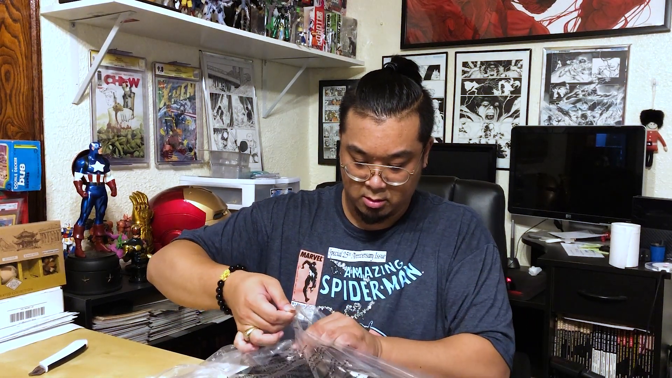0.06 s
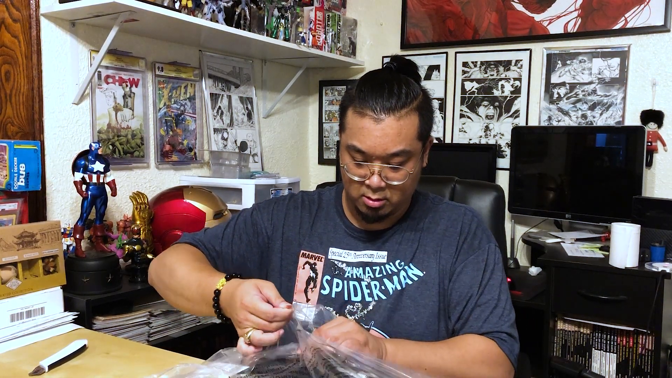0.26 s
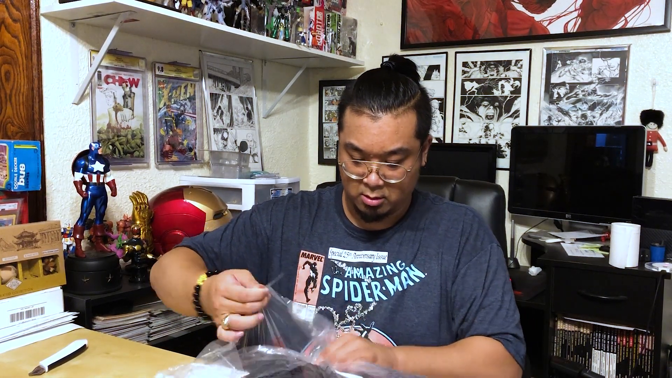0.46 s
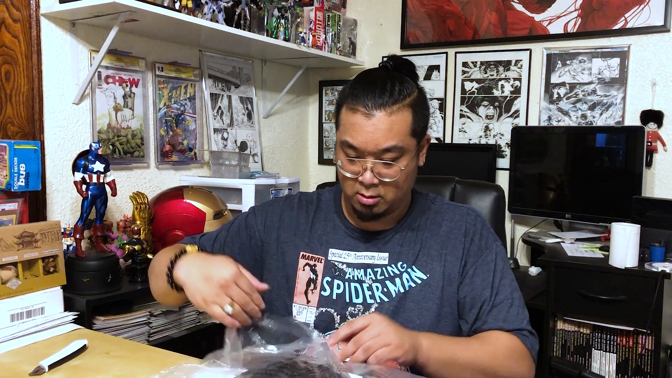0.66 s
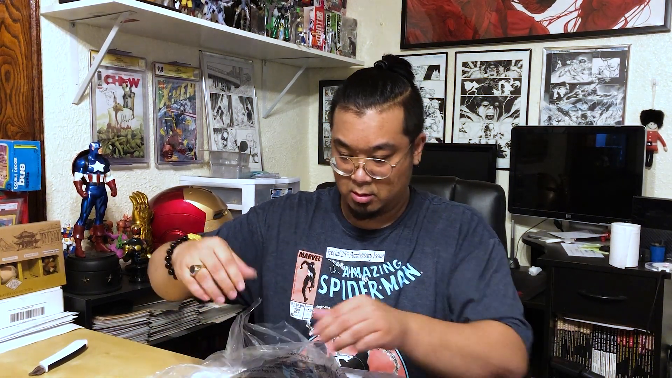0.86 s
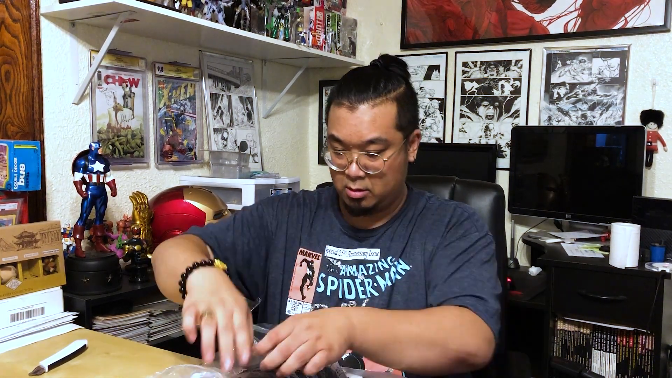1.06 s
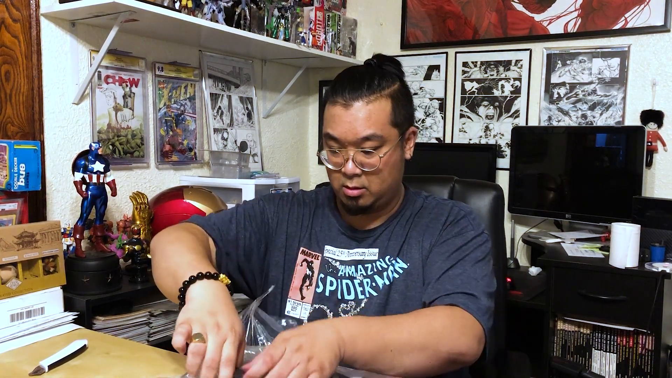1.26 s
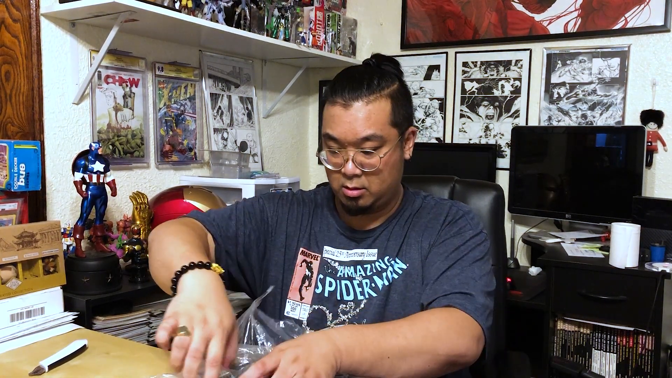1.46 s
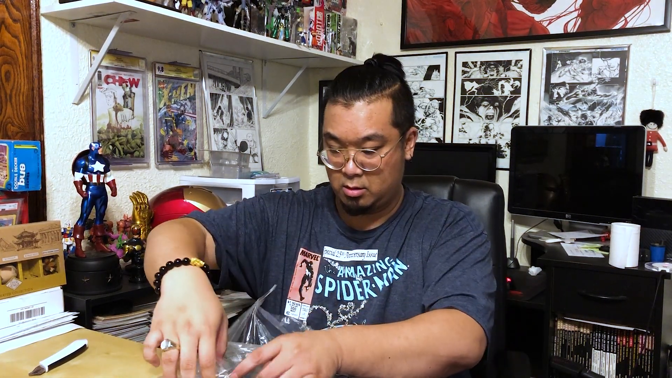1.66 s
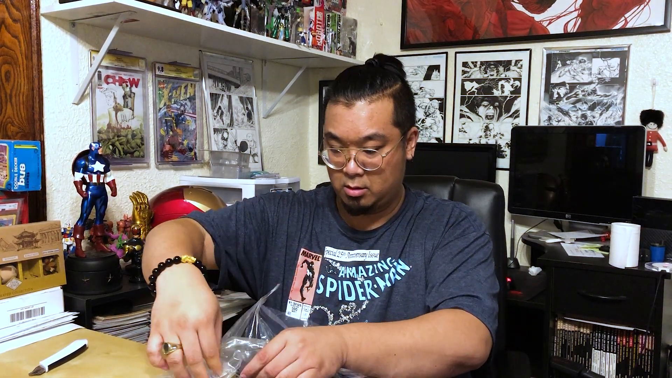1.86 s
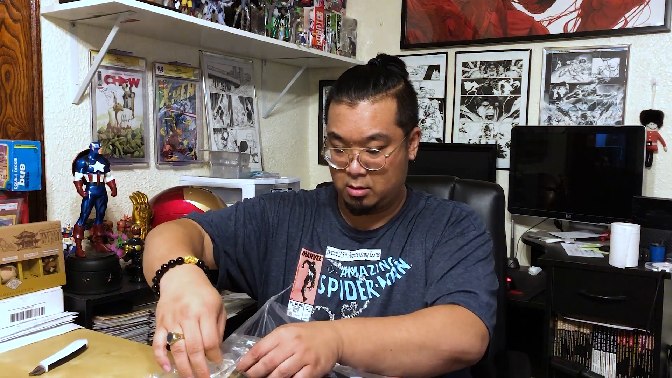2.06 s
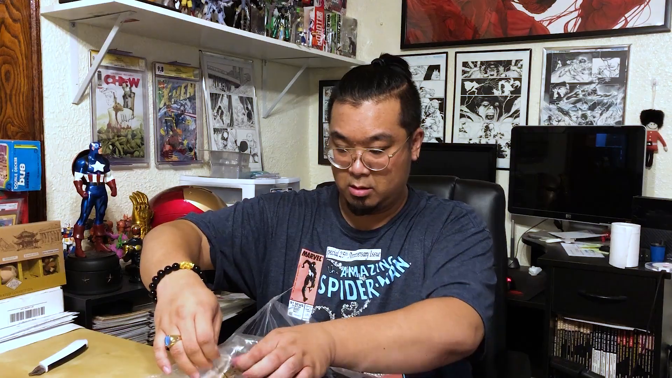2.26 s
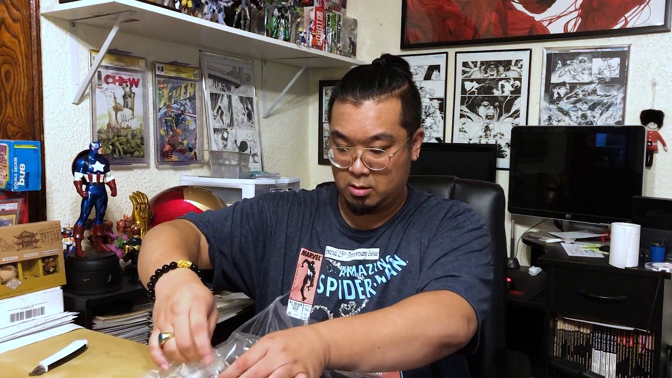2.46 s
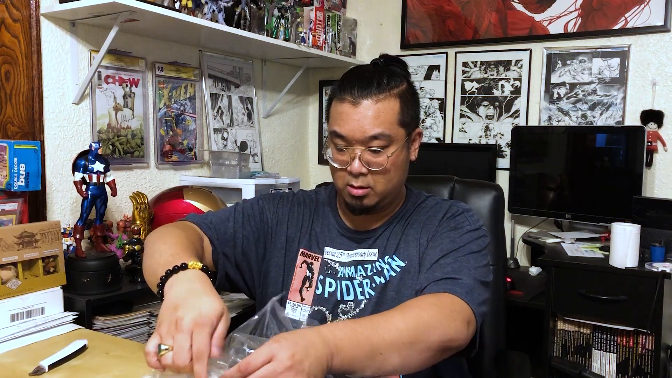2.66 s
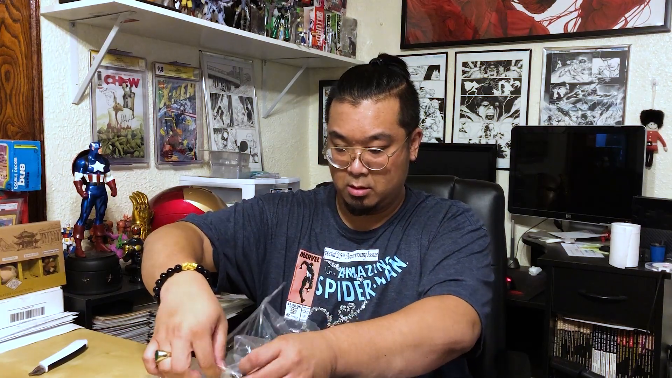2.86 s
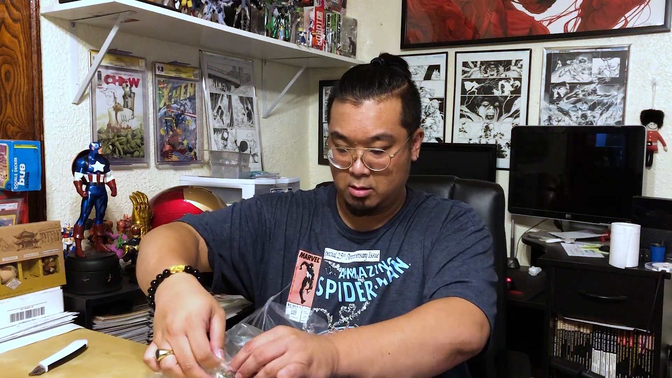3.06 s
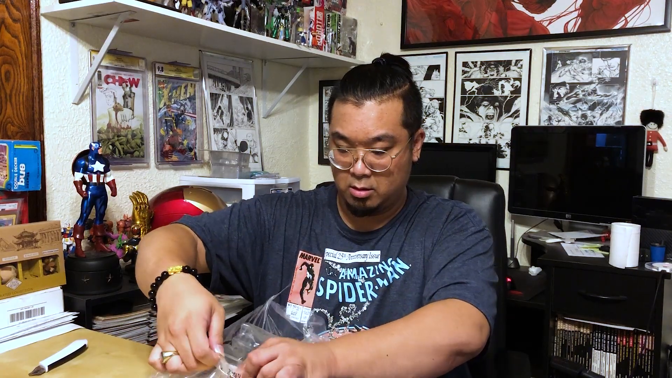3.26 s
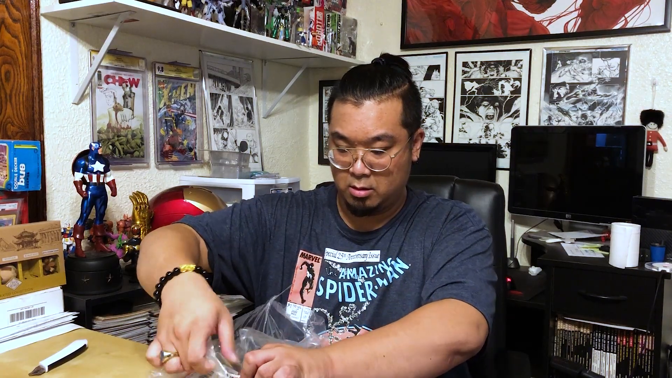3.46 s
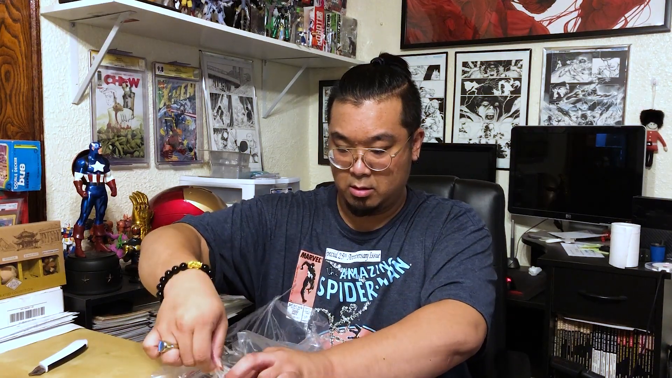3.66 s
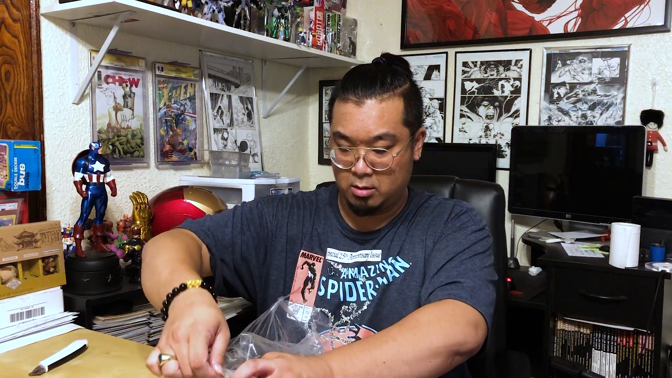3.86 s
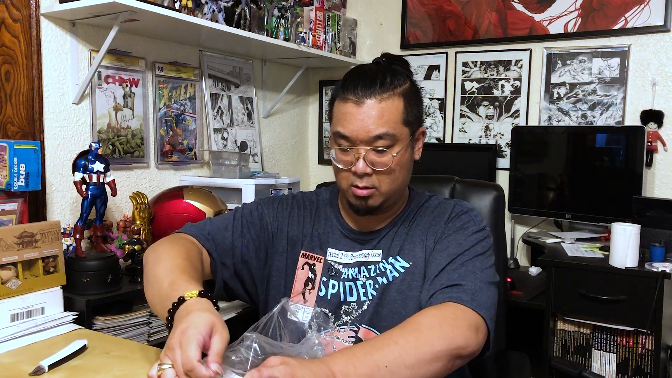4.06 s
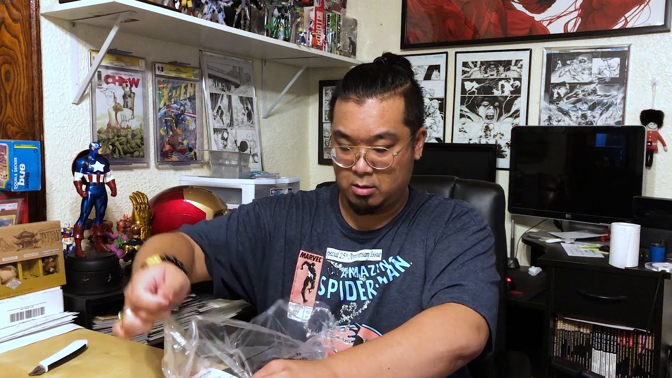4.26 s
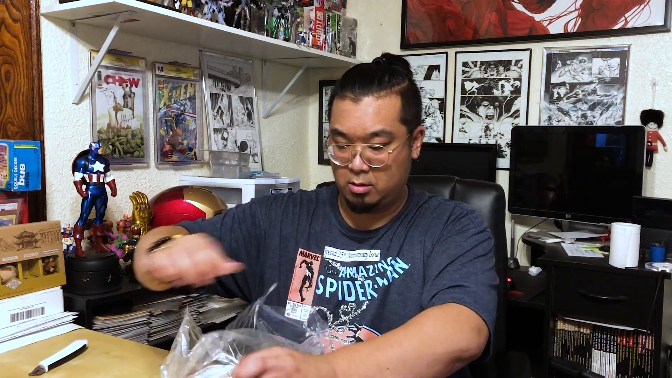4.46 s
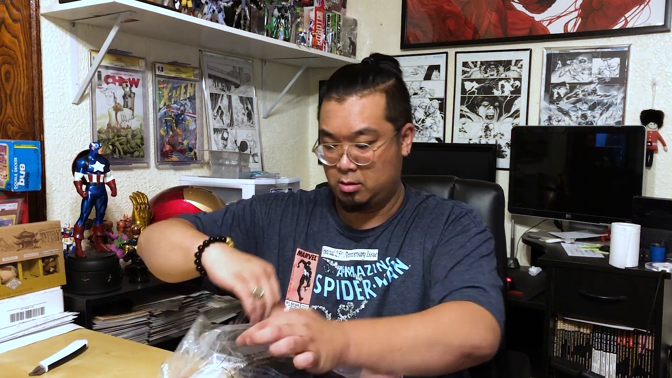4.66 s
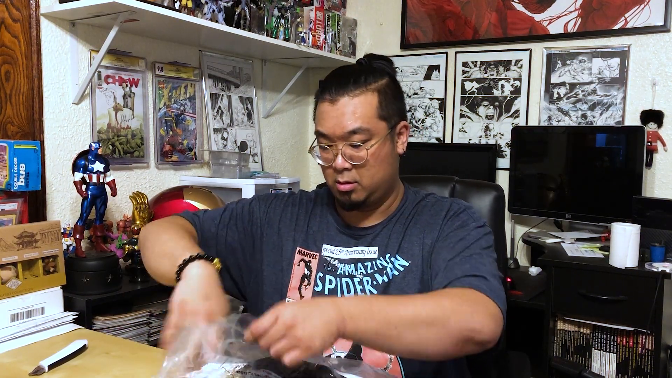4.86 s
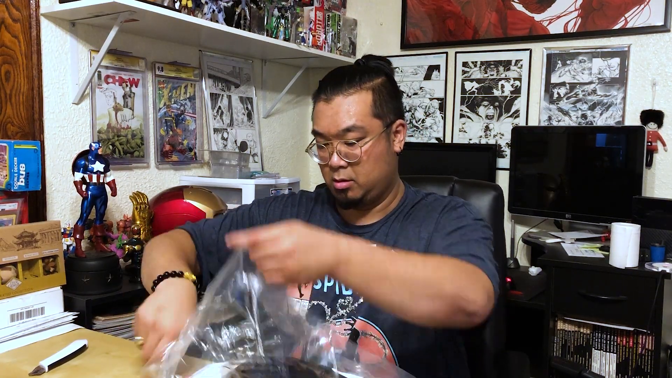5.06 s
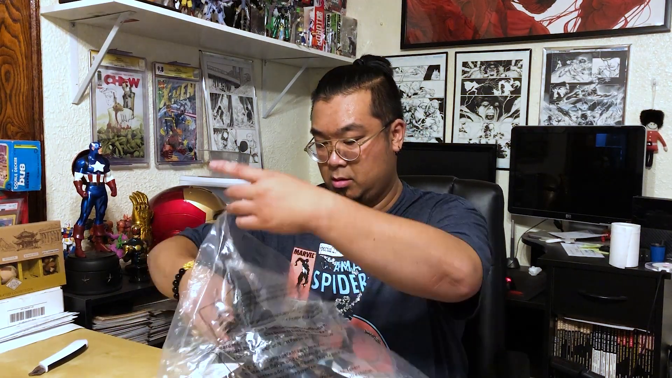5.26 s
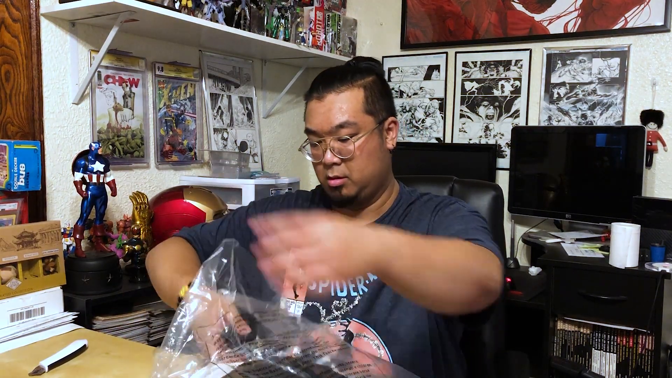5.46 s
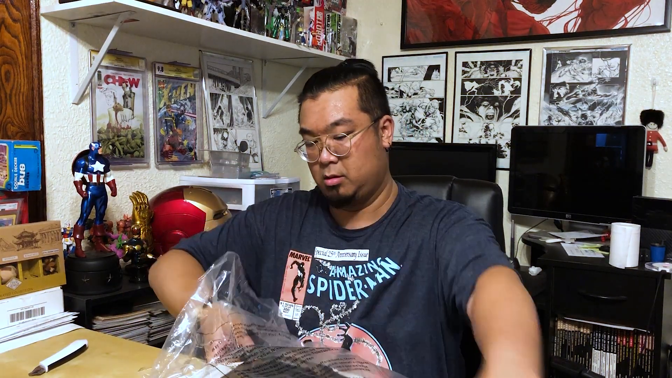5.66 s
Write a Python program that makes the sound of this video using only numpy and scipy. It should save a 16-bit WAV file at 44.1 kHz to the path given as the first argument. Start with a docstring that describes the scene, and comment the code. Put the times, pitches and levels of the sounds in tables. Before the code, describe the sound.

Thin, stiff plastic film is handled close to the microphone in a small room with short reflections. From 0 s it crinkles moderately; at about 0.4-0.5 s a hard tug brings a rush of crackle and a loose sheet whipping with a quick downward thump. Rustling thins and nearly stops around 0.9-1.15 s. From 1.2 s to 4 s the hands fidget steadily: uneven, bright, papery crackle and soft sliding hiss, dotted with tiny sharp snaps, busier near 1.4-1.6, 2.3-2.5 and 3.3-3.7 s. At 4.15-4.3 s a strong tug ends in a hard, sharp pop, the loudest click, with a scatter of crackle after it. Lighter rustle follows, then a fuller, lower crumpling surge at 5.0-5.3 s as the sheet billows. It turns dull and fades by 5.7 s. Still room air and a barely audible, slowly rising low hum lie beneath.

```python
"""Plastic film crackles as hands tug a thin clear wrapper off a new bag at a desk in a small room.
Rustle: clumped facet flips plus sliding hiss; single creases snap as short damped rings.
Early on a bending wave whips the sheet loose with a thump; later the film gives way with a sharp pop.
Panels billow low down, room echoes surround the film, and still air and a faint creeping hum lie underneath."""
import sys
import numpy as np
from scipy import signal
from scipy.fft import rfft, irfft
from scipy.io import wavfile
from scipy.ndimage import uniform_filter1d

SR = 44100
rng = np.random.default_rng(int(sys.argv[2]) if len(sys.argv) > 2 else 0)


def transcribe(u):
    """Save the signal u as a 16-bit wav file named by the first command-line argument.

    u: samples, shape (n,) or (channels, n), limited to [-1, 1]; the rate is SR.
    q: integer samples, one column per channel.
    """
    v = np.clip(np.atleast_2d(u).T, -1, 1)
    q = np.round(v * 32767).astype(np.int16)
    wavfile.write(sys.argv[1], SR, q)


N = 251811
TIME = np.arange(N) / SR  # s

# steady work of the hands on the film: time_s, rustle_db
HAND_EFFORT = [(0.0, -48.5), (0.1, -59.5), (0.31, -52), (0.73, -50.5), (0.93, -74.5), (1.13, -78.5),
               (1.19, -56.5), (1.26, -50), (1.53, -58.5), (1.76, -53.5), (2.04, -57), (2.48, -50.0),
               (2.65, -58), (2.77, -58), (3.24, -52), (3.68, -55.5), (3.77, -60.5), (4.11, -54.5),
               (4.34, -55), (4.92, -53), (5.01, -44.0), (5.22, -46.5), (5.38, -59.5), (5.7, -67.5)]
# sharp tugs, each a short rush of rustle: peak_s, peak_db, fall_s
HAND_TUGS = [(0.395, -40, .03), (0.447, -34, 0.023), (0.478, -40.5, 0.023), (1.425, -50, .038),
             (1.611, -49.5, 0.021), (1.69, -53, .025), (1.884, -55, 0.0278), (2.127, -53.5, 0.0098),
             (2.564, -48.5, .017), (2.7, -53, 0.068), (2.853, -49.5, .04), (3.13, -51.5, 0.022),
             (3.279, -44.5, 0.056), (3.615, -57, 0.12), (3.848, -51, 0.021), (4.108, -51.5, 0.022),
             (4.142, -48, 0.012), (4.198, -40.5, 0.038), (4.265, -38.5, 0.017), (4.623, -50, 0.032),
             (5.505, -55.5, 0.019)]
TUG_RISE_S = 0.016
# drift of the rustle's treble tilt: time_s, tilt_db
TREBLE_TILT = [(0, 0), (1.4, 5), (1.75, 6.5), (2.4, 3.5), (3.1, 6), (4.8, 0.5), (5.25, 3.5), (5.45, -9.5)]
# loudest creases that snap through: start_s, level_db (before a common offset), pitch_hz (centre)
LOUD_CREASES = [(0.1269, -45, 7700), (0.3615, -42.5, 5800), (0.3955, -35.5, 10500), (1.0132, -64, 3620),
                (1.4199, -39.5, 7600), (1.439, -42, 11200), (1.4832, -44, 12400), (1.5478, -35, 7500),
                (1.8868, -41.5, 10100), (1.9386, -45, 5130), (2.209, -47, 8100), (2.242, -42, 6500),
                (2.3566, -42, 8700), (2.3658, -36.5, 8800), (2.4594, -40, 8250), (2.4777, -41.5, 6960),
                (2.676, -41, 7250), (2.8198, -39.5, 5400), (2.8411, -40, 9100), (2.9295, -45.5, 3680),
                (2.9506, -41, 10300), (3.0045, -43, 6000), (3.2564, -36.5, 10200), (3.2853, -43, 5230),
                (3.4487, -36, 7440), (3.5338, -43, 4440), (3.6845, -35.5, 8400), (3.802, -44, 8370),
                (4.1421, -37.5, 5900), (4.1736, -32, 9800), (4.5414, -38, 6780), (4.8259, -42.5, 4470),
                (4.9381, -41, 7000), (5.2119, -34.5, 8300), (5.5926, -48.5, 8310)]
# taut film gives way: start_s, level_db (before a common offset), pitch_hz (centre)
FILM_POPS = [(4.1863, -16.5, 8900), (4.2616, -47, 5170), (4.2655, -42.5, 6100)]
# slack panel flaps: start_s, peak_db, pitch_hz (at the start), travel_s (of the wave)
SHEET_FLAPS = [(0.4368, -23.5, 1350, .008), (0.478, -44, 280, .025), (2.573, -47, 1400, .007),
               (3.337, -43, 1600, .007), (3.45, -47, 1300, .008), (3.685, -50, 700, .008),
               (4.09, -49, 900, .007), (4.824, -55, 350, .015), (5.046, -45, 1500, .006),
               (5.657, -50, 1000, .012), (5.68, -53, 800, .012)]

# relative spectra of the film's sounds: freq_hz, gain_db
CRACKLE_SPECTRUM = [(300, -15), (800, 6.5), (1500, -1), (2800, 2), (5000, -1), (8000, -2), (10500, -4.5),
                    (13000, -5.5), (16000, -11.5)]
SLIDE_SPECTRUM = [(400, -16), (1000, -0.5), (1600, 4.5), (2800, 3), (5000, 1.5), (8000, -6), (10500, -9),
                  (13000, -41), (16000, -33)]
BILLOW_SPECTRUM = [(40, -17.5), (90, -14), (150, 0.5), (250, -3.5), (330, 0), (430, 0), (550, -2),
                   (850, -2.5), (1150, -4.5), (2000, -5), (5000, -49.5)]
SNAP_SPECTRUM = [(150, -6), (700, 7), (1400, 2.5), (3000, 10.5), (6000, 0.5), (10000, -0.5), (13000, 0),
                 (16000, -6)]
POP_SPECTRUM = [(100, -10), (750, -19), (1350, 17), (2050, 7.5), (3200, 3), (5000, 0.5), (7000, -2),
                (10500, -4.5), (13000, 0.5), (16000, 0.5)]
# relative spectrum of the still air: freq_hz, gain_db
AIR_SPECTRUM = [(20, -42), (60, 8), (85, 4), (100, -3.5), (125, 10.5), (175, -1), (260, -0.5), (450, -4),
                (1000, -10.5), (3000, -20), (8000, -25), (16000, -26.5)]

# standing waves of the room: freq_hz, t60_s, level_db (before a common offset)
STANDING_WAVES = [(142, 0.77, -3), (316, 0.13, -5), (527, 0.31, -19), (582, 0.43, -18), (759, 0.092, -9),
                  (910, 0.37, -46)]
# decay of the diffuse tail: freq_hz, t60_s
TAIL_DECAY = [(150, 0.22), (1000, 0.27), (4000, 0.43), (9000, 0.32), (16000, 0.27)]
# hum creeps up: time_s, pitch_hz
HUM_PITCH_CURVE = [(1.0, 27.3), (1.2, 37.9), (1.6, 46), (2.5, 48.6), (3.5, 52.14), (3.9, 64.3),
                   (4.7, 68.94), (5.71, 72.5)]
# bass resonances that lift the hum: freq_hz, width_hz, level_db
BASS_RESONANCES = [(41.5, 7.2, -67), (51, 3.6, -72), (70.5, 3, -65), (83, 7.6, -62), (130.2, 7, -64)]
# hum partials 1, 2, 3: level_db
HUM_PARTIAL_LEVELS = [0, 0, -10]

USUAL_DB = -54  # rustle level of ordinary handling
TILT_PER_DB, DULLEST_DB, BRIGHTEST_DB = 0.45, -13, 5.5  # treble tilt per dB of rustle above usual; limits
BEND_TURNS = 2.425  # wavelengths across a facet at its own pitch
SMALL_PER_S, SMALL_DB, SMALL_SPREAD_DB = 40, 5, 2.5  # chance creases; level against the rustle
SMALL_LOW_HZ, SMALL_HIGH_HZ = 6000, 11500
REBOUND_DB, REBOUND_MIN_S, REBOUND_MAX_S = -9.5, 0.0012, 0.0032  # against and after the first snap
BILLOW_DB, BILLOW_PER_DB = -64.6, 0.8157  # billow at the usual rustle; growth per dB of rustle
SHAKE_DB, POP_SHAKE_DB = -14.5, -31  # billow jolt against the flap's peak, the pop's table level
SHAKE_RISE_S, SHAKE_FALL_S = 0.015, 0.035
PATTERNS_PER_S = 50  # echo patterns
EDGE_HZ = 16250


def amp(db):
    """Decibels to gain."""
    return 10 ** (np.asarray(db) / 20)


def unit(x):
    """Scales to rms 1."""
    return x / np.sqrt(np.mean(x ** 2) + 1e-20)


def read(points, hz):
    """Reads a table on a log-frequency axis."""
    f, value = np.transpose(points)
    return np.interp(np.log(hz + 1), np.log(f + 1), value)


def curves(rows):
    """One value a sample for each column of a time table."""
    s, *columns = np.transpose(rows)
    return [np.interp(TIME, s, c) for c in columns]


def add(mix, s, sound):
    """Mixes a sound in at time s."""
    part = mix[max(0, round(s * SR)):][:len(sound)]
    part += sound[:len(part)]


def burst(s, rise_s, fall_s):
    """Envelope that swells up to time s and dies away after it."""
    return np.exp(np.minimum((TIME - s) / rise_s, (s - TIME) / fall_s))


def colour(x, points, size=4096):
    """Causal filter of unit energy with the given spectrum."""
    hz = abs(np.fft.fftfreq(size, 1 / SR))
    log_gain = np.log(amp(read(points, hz)))
    minimum_phase = np.exp(np.conj(signal.hilbert(log_gain)))
    taps = np.fft.ifft(minimum_phase).real[:size // 2]
    return signal.oaconvolve(x, taps / np.linalg.norm(taps))[:N]


def effort():
    """Rustle level in dB: steady work of the hands plus sharp tugs, summed as power."""
    steady_db, = curves(HAND_EFFORT)
    power = amp(steady_db) ** 2
    for s, db, fall_s in HAND_TUGS:
        power = power + (amp(db) * burst(s, TUG_RISE_S, fall_s)) ** 2
    return 10 * np.log10(power)


def film(rustle_db):
    """Crackle and sliding hiss follow the hands; broad panels of the sheet billow lower down."""
    tilt_db = curves(TREBLE_TILT)[0] + TILT_PER_DB * (rustle_db - USUAL_DB)
    tilt_db = np.clip(tilt_db, DULLEST_DB, BRIGHTEST_DB)
    grains = crackle(rustle_db, per_s=900, spread_db=4, clump_db=4.5, clump_s=0.004, ring_s=0.00017)
    slide = unit(colour(rng.standard_normal(N), SLIDE_SPECTRUM))
    rustle = amp(rustle_db) * (amp(-5.0) * grains + amp(-8.5) * slide)
    # taut film is bright, slack film dull
    body = signal.sosfilt(signal.butter(1, 6500, fs=SR, output="sos"), rustle)
    treble = rustle - body
    rustle = body * amp(-0.4 * tilt_db) + treble * amp(0.95 * tilt_db)
    folds = rng.standard_normal(N) * (rng.random(N) < 1800 / SR)  # 1800 impulses per s
    return rustle + billowing(rustle_db) * unit(colour(folds, BILLOW_SPECTRUM))


def crackle(effort_db, per_s, spread_db, clump_db, clump_s, ring_s, count=24000):
    """Facets of many sizes flip in clumps, more often the harder the film is worked."""
    drift = uniform_filter1d(rng.standard_normal(N), max(2, round(clump_s * SR)))
    clumps = amp(clump_db * unit(drift))
    clumps /= uniform_filter1d(clumps, size=2048)  # clumps share out the stress that the hands supply
    rate = per_s * amp(0.6 * (effort_db - np.median(effort_db)))
    rate = np.minimum(rate, count / TIME[-1])
    place, luck, pitch, bulk, side = rng.random((count, 5)).T
    at = ((np.arange(count) + place) / count * (N - 1)).astype(int)
    flips = luck < (rate * clumps)[at] * TIME[-1] / count
    size_db = spread_db * np.minimum(-np.log(1 - bulk), 3.2)
    sizes = flips * np.sign(side - 0.5) * amp(size_db)
    pitch_hz = 1200 + 13500 * pitch ** 1.5
    grains = sizes[:, None] * buckle(pitch_hz, ring_s, shiver=0.3, shiver_s=0.0015, size=128)
    index = at[:, None] + np.arange(grains.shape[1])
    out = np.bincount(index.ravel(), grains.ravel(), N)[:N]
    return unit(colour(out / np.sqrt(rate), CRACKLE_SPECTRUM))  # level is set by the caller, not the rate


def buckle(hz, ring_s, shiver, shiver_s, leak=0.31, lead_s=0.000355, size=256):
    """Facets flip, one row each: creeping start, damped ring, shiver through the folds. Energy 1."""
    t, hz = np.arange(size) / SR, np.asarray(hz)[:, None]
    flip = min(round(lead_s * SR), size // 2)
    swell = np.minimum((t / lead_s) ** 2, 1) * np.exp(-abs(t - lead_s) / shiver_s)
    noise = rng.standard_normal((len(hz), size))
    kick = shiver * np.sqrt(2 / (shiver_s * SR)) * noise * swell
    kick[:, flip] = 1
    decay = np.exp(-t / ring_s * np.sqrt(hz / 5000))  # small facets stop sooner
    ring = decay * np.cos(2 * np.pi * hz * t)
    f = 1j * np.fft.rfftfreq(2 * size, 1 / SR)
    radiation = (f / (f + leak * hz)) ** 2  # long waves slip round a small facet
    dispersion = np.exp(-2j * np.pi * BEND_TURNS * np.sqrt(f.imag / hz))  # short bending waves run ahead
    spectrum = rfft(kick, 2 * size) * rfft(ring, 2 * size) * radiation * dispersion
    sound = irfft(spectrum)[:, :size]
    return sound / np.linalg.norm(sound, axis=1, keepdims=True)


def billowing(rustle_db):
    """Gain of the sheet's low billow: follows the rustle; every flap and pop shakes it up."""
    steady = amp(BILLOW_DB + BILLOW_PER_DB * (rustle_db - USUAL_DB))
    jolts = [(s + travel_s, db + SHAKE_DB) for s, db, _, travel_s in SHEET_FLAPS]
    jolts += [(s, db + POP_SHAKE_DB) for s, db, _ in FILM_POPS]
    shaken = sum(amp(db) * burst(s, SHAKE_RISE_S, SHAKE_FALL_S) for s, db in jolts)
    return np.hypot(steady, shaken)


def crease_rows(rustle_db, count=400):
    """Loud creases, lesser ones by chance under the hands, and each one's softer second snap."""
    place, luck, size, pitch = rng.random((count, 4)).T
    times = (np.arange(count) + place) / count * TIME[-1]
    db = np.interp(times, TIME, rustle_db) + SMALL_DB + SMALL_SPREAD_DB * (2 * size - 1)
    hz = SMALL_LOW_HZ + (SMALL_HIGH_HZ - SMALL_LOW_HZ) * pitch
    happens = luck < SMALL_PER_S * TIME[-1] / count
    small = np.transpose([times, db, hz])[happens]
    first = np.vstack([LOUD_CREASES, small])
    s, db, hz = first.T
    wait_s = REBOUND_MIN_S + (REBOUND_MAX_S - REBOUND_MIN_S) * rng.random(len(s))
    rebound = np.transpose([s + wait_s, db + REBOUND_DB, hz])
    return np.vstack([first, rebound])


def snaps(rows, spectrum, level_db, ring_s, shiver, shiver_s):
    """Stiff creases snap through: ragged direct sound, and the smoother sum sent all round the room."""
    times, db, hz = np.transpose(rows)
    sizes = amp(db + level_db)[:, None] * np.sqrt(SR / 1000)  # level as rms over 1 ms
    direct, around = np.zeros((2, N))
    for out, ragged in (direct, shiver), (around, 0):
        sounds = sizes * buckle(hz, ring_s, ragged, shiver_s)
        for s, sound in zip(times, sounds):
            add(out, s, sound)
    return colour(direct, spectrum), colour(around, spectrum)


def flaps(crest=0.42, reach=4, order=4):
    """A bending wave whips along the sheet: short waves arrive first, so pitch drops as 1 / time squared."""
    out = np.zeros(N)
    for s, db, hz, travel_s in SHEET_FLAPS:
        u = np.arange(0, reach, 1 / (travel_s * SR))  # time in units of travel_s
        turns = np.cumsum(hz / (1 + u) ** 2) / SR
        rise = (u / crest) ** 2
        swing = 2 * rise / (1 + rise ** 2) * (1 - (u / reach) ** order)
        add(out, s, amp(db) * swing * np.sin(2 * np.pi * turns))
    return out


def room(x, early_db, tail_db, modes_db, count=8):
    """The sheet keeps moving, so its sound passes from one echo pattern to the next."""
    wet = np.zeros(N)
    for k in range(count):
        away = (TIME * PATTERNS_PER_S - k) % count - 1
        share = np.cos(np.pi / 2 * np.minimum(away, 1))  # crossfade between neighbours
        wet += signal.oaconvolve(x * share, echoes(early_db, tail_db, modes_db))[:N]
    return wet


def echoes(early_db, tail_db, modes_db):
    """Scatter off desk and body, a short diffuse tail, and the room's standing waves."""
    t = np.arange(SR // 2) / SR
    early = rng.standard_normal(len(t)) * (t > 0.001) * np.exp(-t / 0.011)
    hz, frame_s, z = signal.stft(rng.standard_normal(len(t)), SR, nperseg=256)
    decay = amp(-60 * frame_s / read(TAIL_DECAY, hz)[:, None])
    tail = signal.istft(z * decay, SR, nperseg=256)[1][:len(t)]
    tail *= 1 - np.exp(-t / 0.001)
    response = amp(early_db) * early / np.linalg.norm(early)
    response += amp(tail_db) * tail / np.linalg.norm(tail)
    for f, t60_s, db in STANDING_WAVES:
        peak = 2 * np.log(1000) / (t60_s * SR)  # gain 1 at resonance
        response += peak * amp(db + modes_db - 60 * t / t60_s) * np.cos(2 * np.pi * f * t)
    return response


def background():
    """Still room air and a low hum that wavers and creeps up in pitch through the bass resonances."""
    hz, = curves(HUM_PITCH_CURVE)
    turns = np.cumsum(hz) / SR
    waver = unit(uniform_filter1d(uniform_filter1d(rng.standard_normal(N), 4000), 2000))
    hum = np.zeros(N)
    for k, partial_db in enumerate(HUM_PARTIAL_LEVELS, 1):
        partial = np.sin(2 * np.pi * k * turns)
        for f, width_hz, db in BASS_RESONANCES:
            resonance = 1 / (1 + (2 * (k * hz - f) / width_hz) ** 2)
            hum += amp(db + partial_db) * resonance * partial
    air = unit(colour(rng.standard_normal(N), AIR_SPECTRUM))
    return hum * amp(1.6 * waver) + amp(-68.0) * air


def scene():
    """All of the wrapper's sounds in the room, over the background."""
    rustle_db = effort()
    rustle, flap = film(rustle_db), flaps()
    creases, creases_around = snaps(crease_rows(rustle_db), SNAP_SPECTRUM, level_db=1.5,
                                    ring_s=0.0001, shiver=0.9, shiver_s=0.00078)
    pop, pop_around = snaps(FILM_POPS, POP_SPECTRUM, level_db=2,
                            ring_s=0.00004, shiver=0.55, shiver_s=0.0004)
    wet = room(rustle + creases_around, early_db=-9.5, tail_db=-5.0, modes_db=2)
    wet += room(pop_around, early_db=-5.5, tail_db=-7.0, modes_db=-1)
    wet += room(flap, early_db=-18, tail_db=-10.0, modes_db=-10)
    return (rustle + creases + pop + flap + wet + background())[None]


def record(dry):
    """Band limit: a linear-phase low-pass at EDGE_HZ."""
    taps = signal.firwin(301, EDGE_HZ, window=("kaiser", 8), fs=SR)
    return signal.oaconvolve(dry, taps[None], "same")


dry = scene()
out = record(dry)
transcribe(out)
```